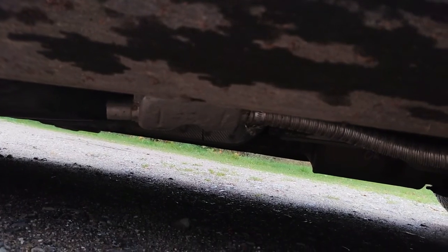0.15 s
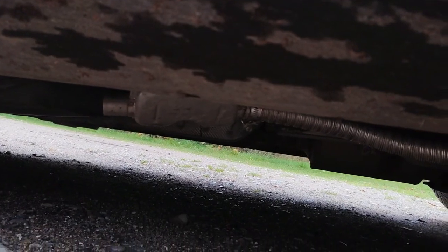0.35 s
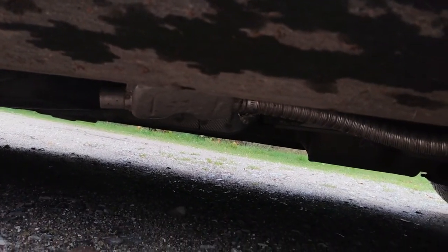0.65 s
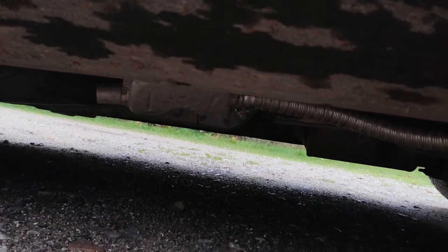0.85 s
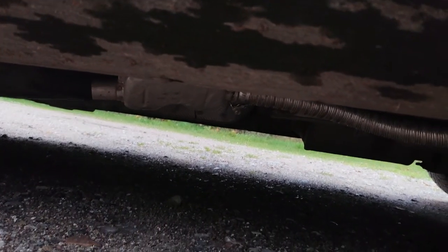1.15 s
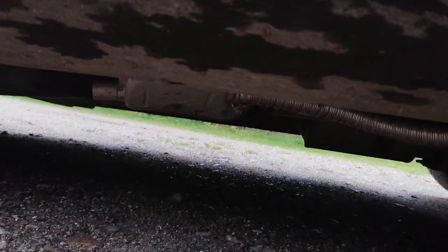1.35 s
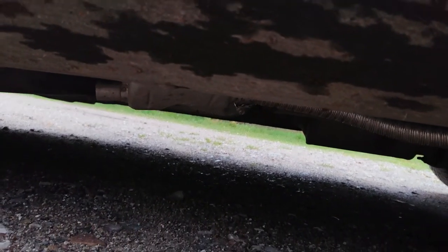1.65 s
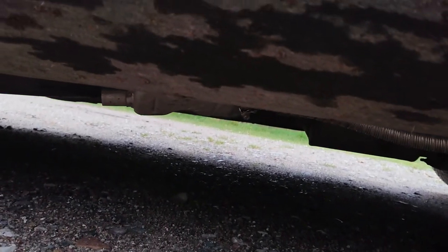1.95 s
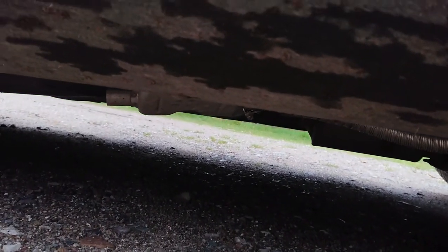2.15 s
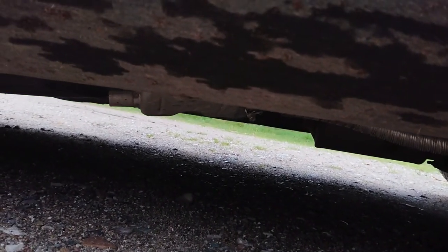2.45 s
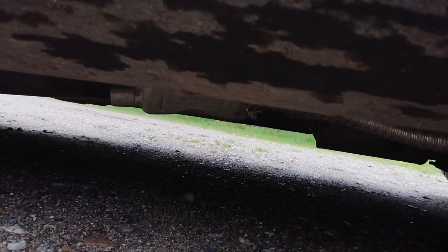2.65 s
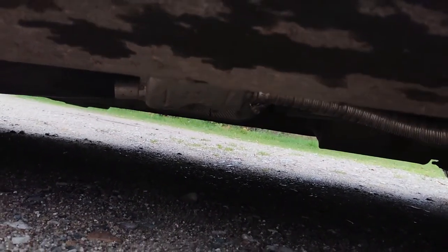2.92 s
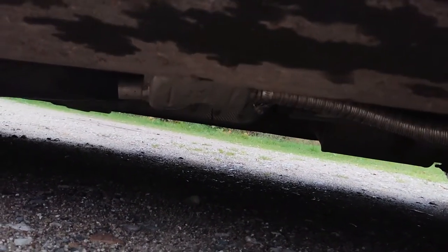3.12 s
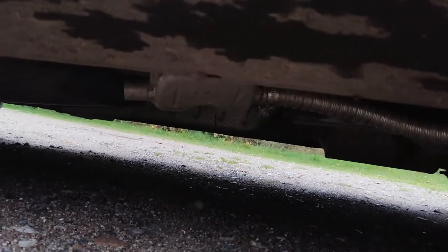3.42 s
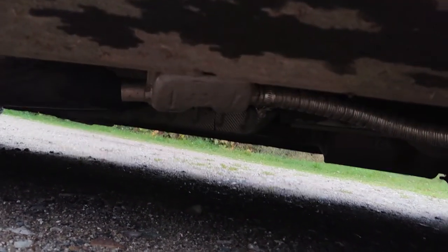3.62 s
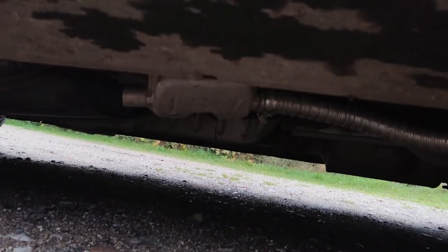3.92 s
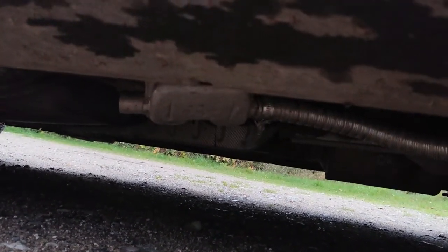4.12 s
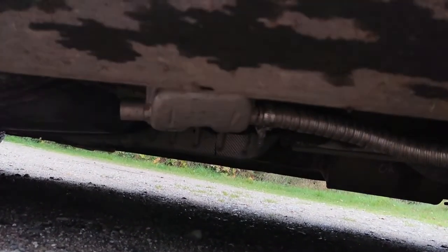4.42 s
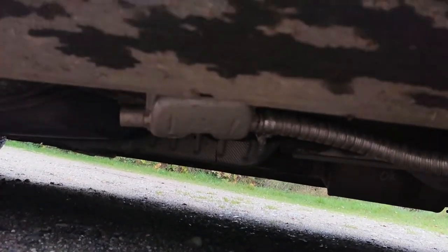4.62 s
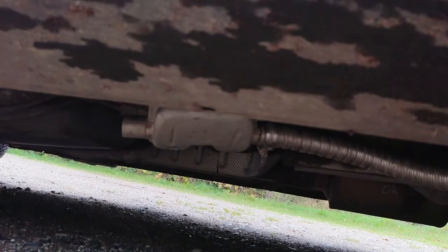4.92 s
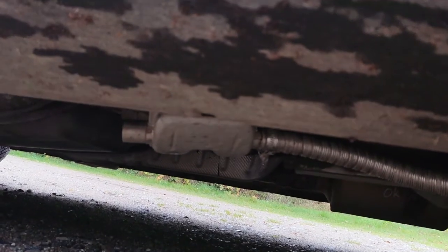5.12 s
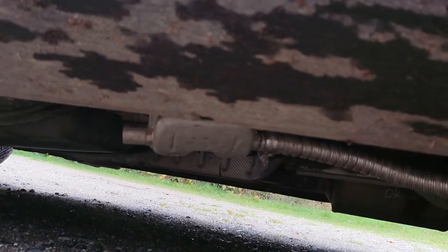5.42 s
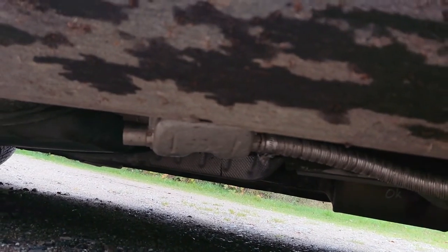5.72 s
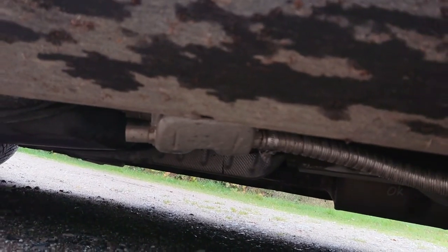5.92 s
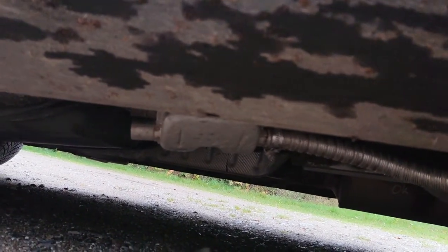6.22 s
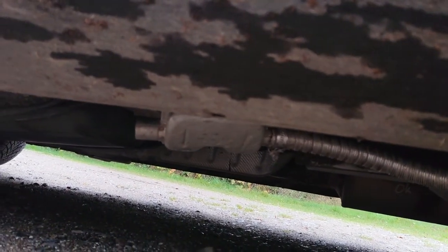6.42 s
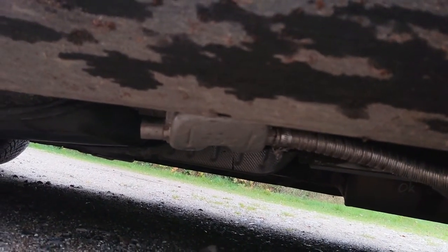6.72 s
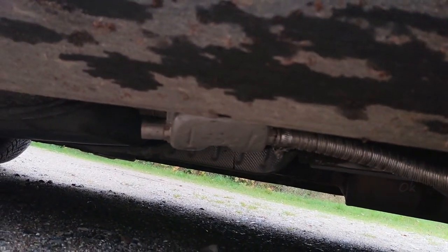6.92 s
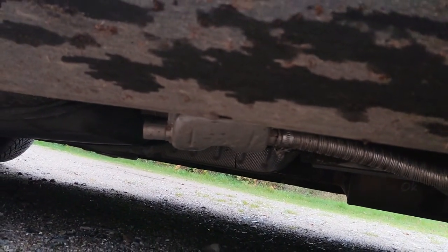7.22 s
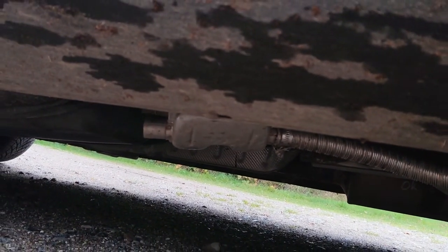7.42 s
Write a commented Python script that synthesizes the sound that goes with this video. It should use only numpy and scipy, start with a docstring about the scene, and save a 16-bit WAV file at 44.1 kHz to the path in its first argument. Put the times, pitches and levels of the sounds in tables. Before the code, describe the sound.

Under a parked vehicle, a small diesel heater exhaust burns steadily with a deep, uneven, puffing rumble. A quieter breathy hiss and faint multi-toned blower whine sit above it. The close hand-held microphone shifts around three to four seconds, changing the hiss's colour and stereo balance. Tiny ticks and light rustles occur, then a short cluster of dry scuffs just after four seconds. The rumble continues to the end.

```python
"""A low, uneven rumble with puffs, a whine and a hiss are heard at once: a diesel heater under a parked vehicle.
Turbulent burning, shaped as noise by pipe resonances, makes the rumble; surges of its level make the puffs.
The blower whines at multiples of its shaft speed, over noise coloured by silencer modes and a breathy whistle.
Midway the hand-held microphone passes the gas jet to another spot: the sources blend between three spots.
Ticks (filtered clicks), rustles and scuffs (grainy noise under envelopes) come from contact with its case."""
import sys
import numpy as np
from scipy import signal
from scipy.fft import rfft, irfft
from scipy.io import wavfile
from scipy.ndimage import uniform_filter1d, map_coordinates

SR = 44100
rng = np.random.default_rng(int(sys.argv[2]) if len(sys.argv) > 2 else 0)


def unload_wav(signal):
    """Save mono or channel-first audio to the path in sys.argv[1] as 16-bit WAV at rate SR, clipped to [-1, 1]."""
    wavfile.write(
        sys.argv[1],
        SR,
        np.round(np.clip(np.atleast_2d(signal).T, -1, 1) * 32767).astype(np.int16),
    )


N = 333528
TIME = np.arange(N) / SR
FREQS = np.maximum(np.arange(N // 2 + 1) * SR / N, 1)  # Hz, kept above zero for logarithms

# Path of the microphone. Each row: time in seconds, spot (0 = first, 1 = passing the jet, 2 = last).
MICROPHONE_PATH = [(0, 0), (2.75, 0), (3.2, 1), (3.9, 1), (4.2, 2), (7.56, 2)]

# Resonances of burner, pipe and silencer.
# Each row: frequency in Hz, nominal width in Hz (narrowed in use), relative power density in dB.
PIPE_RESONANCES = [(58.4, 16, -10.5), (92.06, 22.6, 1.7), (120.5, 48, -9.5), (172, 55, -17),
                   (224, 16, -20.5), (269.5, 51.7, -11.5), (302.3, 23.5, -12), (360, 75, -24),
                   (394.5, 38.4, -18), (408, 32, -27.5), (479.4, 24, -27), (531.4, 28, -27), (580, 17, -28),
                   (624, 19, -23.5), (667, 82, -24.5), (753, 49, -30.5)]
# Stereo lean of the flame. Each row: frequency in Hz, left minus right in dB.
FLAME_LEAN = [(60, -3.5), (300, -3), (500, -2), (800, 2)]
# Strength of the steady flame. Each row: time in seconds, deep boom in dB, roar above it in dB.
FLAME_LEVEL = [(0, -25, -34), (.8, -27, -32.5), (1.2, -27.5, -33), (1.6, -25.5, -32.5), (2.3, -26.5, -33.5),
               (3.3, -25.5, -32), (4.4, -26.5, -33), (5.3, -24, -31), (5.7, -25.5, -31), (6.5, -26, -31),
               (7.56, -23.5, -32.5)]
# Stronger puffs. Each row: crest in seconds, length in seconds at half height, change of boom in dB,
# change of roar in dB (negative where the roar sinks).
FLAME_PUFFS = [(.325, 0.063, 1, 3.5), (0.432, 0.021, 8, 8), (0.515, 0.039, 13, 2.5), (.749, 0.02, 3.3, 4),
               (0.855, 0.026, 8.7, -1), (1.046, 0.05, 5.9, -2), (1.402, 0.055, 3.7, -1),
               (1.691, 0.041, 2.5, -2), (1.791, 0.015, 6, 5.5), (2.0, 0.064, 3.5, -1),
               (2.65, 0.017, 8.2, 4), (2.815, 0.026, 7.9, -1), (2.912, 0.048, 2, 4),
               (3.09, 0.016, 6.6, 6.5), (3.157, 0.026, 0.84, 7), (3.269, 0.041, 4, 4.5),
               (3.39, 0.061, 7.3, 0.5), (3.544, 0.035, 7.5, 5), (3.658, 0.016, 5.9, -2),
               (3.781, 0.034, 8.2, 6.5), (3.873, 0.019, 12, 6), (3.96, 0.05, 4.1, 0.5),
               (4.115, 0.035, 6.7, -3.5), (4.154, 0.02, 3.2, 9), (4.516, 0.019, 4.2, 2),
               (4.585, 0.067, 7, 2), (4.762, 0.033, 9.2, 0.5), (4.84, 0.023, 3.1, 3.5),
               (4.966, 0.026, 7.9, -2.5), (5.135, 0.018, 5, 4), (5.224, 0.035, 3.8, 1.5),
               (5.303, 0.12, 3.5, 0.5), (5.412, 0.029, 4, 3), (5.474, 0.029, 2.7, 5),
               (5.907, 0.021, 7.9, 2.5), (6.265, 0.037, 7.5, 2), (6.367, 0.028, 6.5, 1),
               (6.455, 0.049, 6, 2.5), (6.813, 0.03, 7.7, 2.5), (6.974, 0.059, 6.2, -2),
               (7.34, 0.041, 1.6, 2.5)]
# Moments when the boom falters. Each row: centre in seconds, length in seconds at half height, change in dB.
FLAME_LULLS = [(0.49, 0.041, -5.5), (0.824, 0.026, -8.5), (1.127, 0.14, -3.5), (1.257, 0.067, -3.5),
               (1.714, 0.021, -8), (1.935, 0.08, -5.5), (4.31, 0.02, -10.5), (4.725, 0.049, -11),
               (5.078, .03, -5.5), (5.532, 0.025, -4.5), (5.594, 0.041, -3.5), (5.706, 0.037, -9),
               (6.308, 0.038, -4), (7.212, .03, -1)]
# A puff spends its fuel: length of the swing back after it, and size of that swing as a share of the change.
RECOIL_S, RECOIL_SHARE = 0.02, 0.33
# Boundaries in Hz between the low, middle and high part of the roar.
ROAR_BOUNDARIES_HZ = (335, 450)
# Parts of the roar, low to high. Each row: share of a puff that it follows, dB added at the last spot.
ROAR_BEHAVIOUR = [(1.0, -0.2), (0.47, 1.1), (0.16, 0.3)]

# Level of the gas hiss. Each row: time in seconds, level in dB.
HISS_LEVEL = [(0, -53.5), (1.2, -52.5), (2.3, -54), (2.9, -51), (3.3, -51), (3.8, -51), (4.5, -49.5),
              (6, -49), (7.56, -50.5)]
# Smooth spectrum of the hiss. Each row: frequency in Hz, relative density in dB at each of the three spots.
HISS_SLOPE = [(520, -23.5, -13, -18.5), (930, -5.5, -3, -1.5), (1084, -13, -4, -6.5),
              (1980, -15.5, -18.5, -21), (3330, -18.5, -17.5, -22), (4200.0, -22, -23.5, -30),
              (5930, -25, -21.5, -21), (6800.0, -34, -27, -31), (7140, -49.5, -47, -49)]
# Cross modes of the silencer and flexible pipe.
# Each row: frequency in Hz, nominal width in Hz (narrowed in use), gain in dB at each of the three spots.
SILENCER_MODES = [(1336, 570, 10, 3.6, 9), (1556, 540, 12.5, 10, 14), (1820, 470, 1.5, 9.7, 8.5),
                  (2110, 210, 3, 12.5, 7.5), (2237, 320, 12.5, 15, 10.5), (2560, 130, 0, 1.5, 8.5),
                  (2620, 1300, 3, 13.5, 13.5), (2940, 120, 4, 4, 11.5), (3230, 110, 13.5, 11, 9),
                  (3387, 140, 14, 11, 16), (3687, 240, -11.5, 11.5, 19), (3890, 970, 8, 13.4, 17.5),
                  (4070, 370, 10.5, 12, 18), (4380, 330, 7, 14.5, 12.5), (4700, 520, 2, 6, 8),
                  (5010, 260, 4, 8.5, 12), (5340, 236.0, 4, 1, 9.5), (5470, 450, 1.5, 0.5, -3.5),
                  (5820, 224.0, 3, 5.7, -15)]
# Stereo lean of the hiss. Each row: frequency in Hz, left minus right in dB at each of the three spots.
HISS_LEAN = [(650, 6.5, 3, 0), (960, -3.5, 8.5, 18), (1340, -2.5, -6, 7.5), (1600, -17, -15, 6.5),
             (2000, -17.5, -3.5, 0.5), (2200, 2.5, -6, -5), (2500, 1, -3, -8.5), (2780, -9.5, -1, -4),
             (3300, -1, -5, -7.5), (3700, -2, -7, -7), (4100, -5, -7.5, -11.5), (4500, 7.5, 5.5, 4),
             (5100, -2, 3, 2), (5800, 0.5, 0, 0.5), (6500, -3.5, -0.5, -1.5)]
# Direct sound and echoes from the underbody meet at the two microphone ports.
# Each row: frequency in Hz, radians by which the left leads at each of the three spots.
PORT_PHASE_LEAD = [(900.0, 0.1, -1.4, -1.6), (1035.0, 0.4, -2.2, -2.5), (1170.0, 1.8, -2.9, -1.4),
                   (1305.0, 2.3, -3.1, -3.5), (1440.0, 2.5, -3.1, -3.6), (1575.0, 4.0, -2.9, -3.8),
                   (1710.0, 4.6, -3.7, -4.9), (1845.0, 4.2, -2.5, -2.3), (1980.0, 4.4, -3.1, -0.0),
                   (2115.0, 3.0, -3.6, -0.6), (2250.0, 3.0, -3.9, 0.6), (2385.0, 5.9, -1.7, -1.1),
                   (2520.0, 3.8, -2.6, -3.2), (2655.0, 3.7, -3.1, -3.6), (2790.0, 6.3, -3.6, -2.1),
                   (2925.0, 7.3, -5.4, -0.6), (3060.0, 9.1, -3.8, -3.1), (3195.0, 9.2, -4.0, -3.5),
                   (3330.0, 10.2, -6.7, -2.8), (3465.0, 9.6, -8.8, -3.6), (3600.0, 10.1, -10.3, -4.9),
                   (3735.0, 10.6, -9.2, -5.4), (3870.0, 13.0, -12.2, -6.3), (4005.0, 12.6, -14.0, -7.0),
                   (4140.0, 12.2, -14.2, -7.9), (4275.0, 11.6, -14.4, -6.1), (4410.0, 13.0, -13.8, -3.5),
                   (4545.0, 15.2, -16.0, -3.6), (4680.0, 12.1, -14.0, -4.5), (4815.0, 12.8, -16.0, -5.6),
                   (4950.0, 15.7, -16.9, -5.5), (5085.0, 15.3, -18.3, -6.7), (5220.0, 14.3, -15.4, -6.4),
                   (5490.0, 11.2, -15.0, -9.1), (5760.0, 14.2, -17.0, -11.6), (5895.0, 13.4, -18.0, -13.2),
                   (6165.0, 12.0, -18.3, -9.0)]

# Blower shaft, before its small fluctuations. Each row: time in seconds, speed in turns per second.
SHAFT_SPEED = [(0, 45.44), (.55, 45.74), (.85, 45.98), (1.2, 46.15), (1.9, 46.66), (5.5, 46.66),
               (6.2, 46.69), (7.1, 46.71), (7.56, 46.63)]
# Fuel pump strokes per second, and the share by which they sway the blower's speed.
PUMP_HZ, PUMP_RIPPLE = 3.7, 0.00047
# Strong blower orders.
# Each row: multiple of the shaft speed, then level in dB left and right at each of the three spots.
STRONG_ORDERS = [(19, -64.0, -66.0, -62.5, -71.5, -59.0, -77.0),
                 (21, -62.5, -56.5, -56.5, -63.5, -50.0, -68.5),
                 (35, -80.0, -67.5, -64.5, -73.0, -58.0, -74.0),
                 (36, -71.0, -67.5, -67.5, -75.5, -56.0, -75.5),
                 (38, -78.0, -80.0, -87.0, -74.5, -73.5, -77.0),
                 (40, -73.5, -76.0, -72.0, -71.0, -79.5, -70.5),
                 (41, -67.5, -73.0, -66.0, -76.5, -79.0, -77.5),
                 (45, -75.0, -81.0, -76.0, -68.0, -81.5, -68.5),
                 (46, -79.5, -78.5, -80.0, -68.0, -83.5, -69.5),
                 (49, -78.5, -68.5, -85.0, -80.0, -78.5, -81.0),
                 (50, -79.5, -70.0, -78.0, -71.5, -76.5, -74.5),
                 (51, -75.0, -75.0, -73.0, -72.5, -63.5, -71.0),
                 (52, -69.5, -75.0, -71.5, -80.0, -66.0, -76.5),
                 (53, -74.0, -81.0, -71.0, -80.0, -80.0, -79.5),
                 (54, -68.5, -70.5, -73.0, -62.5, -75.5, -64.0),
                 (57, -64.5, -69.5, -65.0, -66.0, -74.5, -67.5),
                 (58, -71.5, -71.0, -74.0, -65.5, -71.5, -66.0),
                 (61, -74.0, -71.0, -74.0, -76.5, -72.0, -75.0),
                 (62, -73.0, -70.5, -75.0, -66.5, -68.5, -67.5),
                 (63, -79.0, -76.5, -78.0, -72.5, -86.0, -70.5),
                 (65, -83.0, -75.0, -88.0, -71.0, -80.0, -71.5),
                 (66, -87.5, -82.5, -81.0, -70.0, -76.0, -73.0),
                 (67, -80.0, -76.0, -73.0, -66.0, -73.5, -70.0),
                 (71, -79.5, -81.5, -80.0, -79.0, -85.5, -80.5),
                 (72, -65.5, -69.0, -66.0, -65.0, -72.5, -74.5),
                 (73, -82.0, -77.5, -85.5, -73.0, -81.5, -68.5),
                 (74, -67.0, -67.0, -81.5, -63.5, -71.0, -62.0),
                 (75, -72.0, -69.5, -87.5, -67.0, -79.0, -72.5),
                 (78, -77.5, -76.5, -86.0, -67.0, -82.5, -65.5),
                 (79, -76.5, -78.0, -88.0, -65.5, -69.0, -62.5),
                 (80, -72.0, -86.5, -79.5, -67.0, -73.5, -66.5),
                 (82, -75.0, -77.0, -77.5, -67.0, -74.0, -64.5),
                 (84, -74.0, -74.5, -73.5, -74.0, -81.5, -73.5),
                 (87, -83.0, -78.0, -79.0, -70.5, -79.0, -68.0),
                 (88, -78.0, -75.0, -79.0, -81.5, -77.0, -72.0),
                 (94, -78.5, -82.5, -74.5, -84.5, -92.0, -84.5),
                 (95, -77.0, -80.0, -73.0, -84.0, -76.0, -91.5),
                 (96, -76.0, -85.5, -84.0, -80.5, -72.0, -79.5),
                 (102, -87.0, -85.5, -80.0, -85.5, -78.0, -78.5),
                 (103, -88.5, -83.5, -89.5, -79.5, -89.0, -78.5),
                 (107, -85.5, -87.0, -82.0, -78.0, -85.0, -77.0),
                 (109, -83.5, -82.5, -80.5, -80.0, -85.5, -78.0),
                 (113, -80.0, -92.5, -92.0, -96.0, -83.5, -83.0),
                 (115, -87.0, -88.0, -84.0, -86.0, -73.0, -76.0),
                 (117, -82.0, -83.5, -80.0, -78.0, -80.5, -77.5),
                 (121, -82.0, -85.0, -88.0, -88.0, -90.0, -90.0)]
# Mean level of the weak orders. Each row: frequency in Hz, level in dB relative to the colour of the hiss.
WEAK_ORDER_LEVEL = [(1700, -73), (3300, -71), (4400, -66.5), (5800, -66)]
# This order rings out while the rising speed takes it through a pipe mode.
RINGING_ORDER, RING_HZ, RING_WIDTH_HZ, RING_DB = 36, 1645.6, 40, -62.5

# Breathy pipe whistle. Each row: time in seconds, pitch in Hz before wander, level in dB, left minus right in dB.
PIPE_WHISTLE = [(0, 1545, -59.5, -12), (1, 1578, -55.5, -12.5), (2.55, 1592, -59.5, -2.5),
                (2.88, 1585, -54.5, -16.5), (3.1, 1528, -57, -6.5), (3.8, 1550, -72.5, 7),
                (4.3, 1636, -62.5, 2.5), (7.56, 1656, -58, 4)]

# Small ticks. Each row: start in seconds, peak in dB before panning, left minus right in dB,
# lowest frequency in Hz, highest frequency in Hz.
CASE_TICKS = [(0.462, -34.5, -19.5, 496, 2200), (.93, -38, -11, 900, 4500), (1.058, -34.5, -15, 600, 2360),
              (2.053, -45, -23, 4000, 6800), (2.9535, -32.5, -20, 400, 4800), (3.133, -46, -8, 5220, 7450),
              (3.181, -32.5, -6, 800, 4200), (5.492, -43.5, 12, 2500, 6240), (6.172, -35.5, 6, 900, 2970)]
# Fingers brush lightly over the case. Each row: crest in seconds, length in seconds at half height, level in dB.
CASE_RUSTLES = [(.69, .04, -70), (.89, .13, -68), (1.07, .04, -75), (1.39, .02, -73), (1.49, .06, -70),
                (1.8, .06, -79), (2.77, .05, -72), (2.928, .022, -60), (2.96, .18, -77), (3.98, .025, -72),
                (4.35, .02, -72)]
# Spectrum of that brushing. Each row: frequency in Hz, relative density in dB.
RUSTLE_SPECTRUM = [(1000, 0), (6000, 5), (7700, -8), (11000, -4), (14500, 3)]
# A hand scuffs the case. Each row: start in seconds, length in seconds, level in dB, left minus right in dB.
CASE_SCUFFS = [(4.1085, 0.004, -33, 22), (4.112, 0.022, -44, 20), (4.142, 0.08, -63, 14),
               (4.168, 0.005, -44.5, 16), (4.202, 0.0045, -47, 7), (4.255, 0.0097, -42, 19),
               (4.2625, 0.02, -32, 36), (4.2755, 0.004, -32, 30), (4.301, 0.003, -25, 28)]
# Spectrum of the scuffs. Each row: frequency in Hz, relative density in dB.
SCUFF_SPECTRUM = [(300, 7.5), (700, 0), (1200, 4.5), (2700, 3), (4300, 1.5), (5600, 1.5), (6200, -5.5),
                  (7700, -34), (11000, -24), (15500, -20)]

CUTOFF_HZ = 15900  # upper limit of the output


def from_db(db):
    """Logarithmic level: twenty decibels are a tenfold amplitude."""
    return 10 ** (np.asarray(db) / 20)


def rms_one(x):
    """Power normalisation: scale a signal to a mean square of one."""
    return x / np.sqrt(np.mean(x ** 2) + 1e-20)


def in_time(rows):
    """Linear interpolation: read each column of a time curve at every sample."""
    seconds, *columns = np.transpose(rows)
    return [np.interp(TIME, seconds, column) for column in columns]


def at_hz(points, hz, axis=1):
    """Logarithmic frequency scale: interpolate one column of a spectrum along it."""
    points = np.array(points)
    return np.interp(np.log(hz), np.log(points[:, 0]), points[:, axis])


def pan(lean_db):
    """Intensity stereo: left and right gains of constant total power."""
    gains = from_db(np.array([[.5], [-.5]]) * lean_db)
    return gains / np.sqrt(np.mean(gains ** 2, axis=0))


def drift(rate):
    """Low-passed chance: smooth random motion of spread one, with its corner at a rate in Hz."""
    step = 64  # samples between the slow values
    count = N // step + 2
    hz = np.arange(count // 2 + 1) * SR / step / count
    slow = irfft(rfft(rng.standard_normal(count)) / (1 + (hz / rate) ** 2), count)
    return np.interp(TIME, np.linspace(0, N / SR, count), rms_one(slow))


def swell(s, length):
    """Gaussian envelope: a bell of height one around a moment, with its length taken at half height."""
    return np.exp(-np.log(2) * np.minimum((2 * (TIME - s) / length) ** 2, 20))


def stereo_noise(colour, lean_db, alike_hz, lag_s=0, lead=0):
    """Partial coherence: coloured noise, later on the right by lag and phase, less alike above alike_hz."""
    mid, side = rfft(rng.standard_normal((2, N)))
    alike = 1 / (1 + (FREQS / alike_hz) ** 2)
    both = np.sqrt(1 + alike) * mid + np.sqrt(1 - alike) * side * [[1], [-1]]
    delay_phase = 2 * np.pi * FREQS * lag_s + lead
    late = np.exp(-1j * delay_phase * np.array([[0], [1]]))
    return rms_one(irfft(both * late * colour * pan(lean_db), N))


def steadied(x, evenness, size):
    """Partial compression: take a share of the slow power swells out of a noise."""
    slow_power = uniform_filter1d(np.mean(x ** 2, axis=0), size=size)
    return rms_one(x / slow_power ** (evenness / 2))


def surges_db():
    """Unsteady combustion: puffs lift the boom, raise or lower the roar, then briefly swing back; lulls dip the boom."""
    boom = sum(db * swell(s, length) for s, length, db in FLAME_LULLS)
    roar = 0
    for s, length, boom_db, roar_db in FLAME_PUFFS:
        recoil = swell(s + length / 2 + RECOIL_S, RECOIL_S)
        puff = swell(s, length) - RECOIL_SHARE * recoil
        boom = boom + boom_db * puff
        roar = roar + roar_db * puff
    return boom, roar


def swayed(x, share=0.0351, rate_hz=6.17):
    """Frequency modulation: uneven heat and flow shift the pipe's resonances up and down."""
    shift = np.cumsum(share * drift(rate_hz))
    read = np.arange(N) + shift - shift[-1] * TIME / TIME[-1]  # no net shift at the end
    return np.array([map_coordinates(side, [read], order=3, mode="reflect") for side in x])


def fluttered(x, surge_db, place, depth_db=1.0, rate_hz=18.0):
    """Amplitude modulation by bands: parts of the roar flutter apart; the lowest follows the puffs most."""
    spectrum = rfft(x)
    band = np.digitize(FREQS, ROAR_BOUNDARIES_HZ)
    out = 0
    for k, (follows, moved_db) in enumerate(ROAR_BEHAVIOUR):
        level_db = follows * surge_db + moved_db * place + depth_db * drift(rate_hz)
        out = out + irfft(spectrum * (band == k), N) * from_db(level_db)
    return out


def flame(place, evenness=0.35, skirt=1.73, split_hz=185):
    """Resonance: turbulent burning excites the pipe; the deep boom surges more than the roar above."""
    power = 0
    for hz, width, db in PIPE_RESONANCES:
        power = power + from_db(db) ** 2 / (1 + ((FREQS - hz) / (width * 0.49)) ** 2) ** skirt
    # the open pipe radiates little bass, the silencer swallows the treble
    colour = np.sqrt(power / (1 + (52 / FREQS) ** 10) / (1 + (FREQS / 850) ** 10))
    deep_share = 1 / (1 + (FREQS / split_hz) ** 10)
    lean_db = at_hz(FLAME_LEAN, FREQS)
    boom = stereo_noise(colour * np.sqrt(deep_share), lean_db, alike_hz=1700, lag_s=0.00025)
    roar = stereo_noise(colour * np.sqrt(1 - deep_share), lean_db, alike_hz=1700, lag_s=0.00025)
    boom_db, roar_db = in_time(FLAME_LEVEL)
    boom_surge_db, roar_surge_db = surges_db()
    boom = steadied(swayed(boom), evenness, size=SR // 25) * from_db(boom_db + boom_surge_db)
    roar = steadied(roar, evenness, size=SR // 16)
    roar = fluttered(roar, roar_surge_db, place) * from_db(roar_db)
    return (boom + roar) * pan(1.4 - 0.53 * place)


def hiss_db(hz, spot):
    """Modal filtering: a smooth slope of the jet at one spot, shaped by the silencer's modes."""
    power = 1
    for centre, width, *db in SILENCER_MODES:
        power = power + (from_db(db[spot]) ** 2 - 1) / (1 + ((hz - centre) / (width * 0.15)) ** 2) ** 2
    return at_hz(HISS_SLOPE, hz, axis=spot + 1) + 10 * np.log10(np.maximum(power, .1))


def gas_hiss(spots, flutter_db=1.5):
    """Jet noise: gas hisses through the silencer's modes, with another colour at each spot."""
    out = 0
    for spot, weight in enumerate(spots):
        lean_db = at_hz(HISS_LEAN, FREQS, axis=spot + 1)
        lead = at_hz(PORT_PHASE_LEAD, FREQS, axis=spot + 1)
        colour = from_db(hiss_db(FREQS, spot))
        out = out + weight * stereo_noise(colour, lean_db, alike_hz=4900, lead=lead)
    return out * from_db(in_time(HISS_LEVEL)[0] + flutter_db * drift(35))


def shaft_turns(jitter=0.0003):
    """Integrated rotation: turns of the shaft so far; its speed trembles and sways with the fuel pump."""
    pump = PUMP_RIPPLE * np.sin(2 * np.pi * PUMP_HZ * TIME)
    speed = in_time(SHAFT_SPEED)[0] * (1 + jitter * drift(11.3) + pump)
    return np.cumsum(speed) / SR


def blower(spots, turns, waver_db=1.5, uneven_db=6.5, count=5, size=2 ** 15):
    """Order spectrum: tones at multiples of the shaft speed; a few stand out of a thicket of weak ones."""
    strong = {round(row[0]): row[1:] for row in STRONG_ORDERS}
    groups = np.zeros((count, len(spots), 2, size // 2 + 1), complex)   # group, spot, side, order
    for order in sorted(set(strong) | set(range(37, 128))):
        hz = order * SHAFT_SPEED[-1][1]  # place in the spectrum at the final speed
        colour_db = np.repeat([hiss_db(hz, spot) for spot in range(len(spots))], 2)
        chance_db = uneven_db * rng.standard_normal(len(colour_db))
        weak = at_hz(WEAK_ORDER_LEVEL, hz) + colour_db + chance_db
        level_db = np.reshape(strong.get(order, weak), (-1, 2))
        leads = [at_hz(PORT_PHASE_LEAD, hz, axis=spot + 1) for spot in range(len(spots))]
        phases = rng.uniform(0, 2 * np.pi) - np.outer(leads, [0, 1])
        groups[order % count, :, :, order] = from_db(level_db) * np.exp(1j * phases)
    # one turn of the shaft as a wavetable, scaled so that the levels are effective values
    one_turn = (irfft(groups, size) * size / np.sqrt(2)).astype(np.float32)
    shaft = (turns * size).astype(int) % size
    heard = 0
    for wave in one_turn:  # interleaved groups of orders waver on their own
        heard = heard + np.take(wave, shaft, axis=-1) * from_db(waver_db * drift(24.0))
    return sum(weight ** 2 * whine for weight, whine in zip(spots, heard))


def ringing_order(turns, lean_db=-9):
    """Passage through resonance: one blower tone swells and fades as it climbs through a pipe mode."""
    off = 2 * (RINGING_ORDER * in_time(SHAFT_SPEED)[0] - RING_HZ) / RING_WIDTH_HZ
    tone = np.sqrt(2) * np.sin(2 * np.pi * RINGING_ORDER * turns)
    return from_db(RING_DB) * pan(lean_db) * tone / (1 + off ** 4)


def whistle(flutter_hz=20, wander_hz=10, evenness=0.21):
    """Flow-excited tone: gas stirs a narrow pipe tone that flutters finely and wanders in pitch."""
    hz, db, lean_db = in_time(PIPE_WHISTLE)
    quarter_turn = np.array([[0], [np.pi / 2]])  # between left and right
    phase = 2 * np.pi * np.cumsum(hz + wander_hz * drift(5.4)) / SR + quarter_turn
    tone = drift(flutter_hz) * np.cos(phase) + drift(flutter_hz) * np.sin(phase)
    return from_db(db) * pan(lean_db) * steadied(tone, evenness, size=SR // 20)


def high_whine(place, hz=15660, width_hz=60, db=-85.5, rise_db=9.0):
    """Narrow-band noise: a very faint, thin whine at the top of hearing, stronger at the last spot."""
    colour = 1 / (1 + ((FREQS - hz) / width_hz) ** 2)
    return from_db(db + rise_db * place) * stereo_noise(colour, 10, alike_hz=8000)


def ticks(decay_s=0.0018, crackle=0.085):
    """Impulse excitation: tiny contacts, a snap and a brief crackle, each in a band of its own."""
    out = np.zeros((2, N))
    age = TIME[:SR // 20]
    for s, db, lean_db, low_hz, high_hz in CASE_TICKS:
        contact = (age == 0) + crackle * rng.standard_normal(len(age)) * np.exp(-age / decay_s)
        band = signal.butter(3, [low_hz, high_hz], "band", fs=SR, output="sos")
        tick = signal.sosfilt(band, contact)
        start = round(s * SR)
        out[:, start:start + len(age)] += from_db(db) * pan(lean_db) * tick / np.abs(tick).max()
    return out


def rustles(grain_db=4.0, lean_db=-3.5, grains_hz=250):
    """Light friction: airy, grainy brushing that swells and fades with each shift of the grip."""
    air = stereo_noise(from_db(at_hz(RUSTLE_SPECTRUM, FREQS)), lean_db, alike_hz=9000)
    grainy = rms_one(air * from_db(grain_db * drift(grains_hz)))
    return grainy * sum(from_db(db) * swell(s, length) for s, length, db in CASE_RUSTLES)


def scuffs(grain_db=1.5, rise_s=0.00092, fall_s=0.0039):
    """Sliding friction: short grainy rubs that die quickly as the skin stops sliding."""
    rub = stereo_noise(from_db(at_hz(SCUFF_SPECTRUM, FREQS)), 0, alike_hz=2500)
    rub = rms_one(rub * from_db(grain_db * drift(300)))
    strokes = 0
    for s, length, db, lean_db in CASE_SCUFFS:
        rise = np.clip((TIME - s) / rise_s, 0, 1)
        fall = np.exp(-np.clip((TIME - s - length) / fall_s + 1, 0, 20))
        strokes = strokes + from_db(db) * pan(lean_db) * rise * fall
    return rub * strokes


def scene():
    """Superposition: all sources add, with flame, hiss and blower varying between the microphone's spots."""
    place, = in_time(MICROPHONE_PATH)
    spots = np.sqrt([np.clip(1 - np.abs(place - spot), 0, 1) for spot in (0, 1, 2)])
    turns = shaft_turns()
    heater = flame(spots[-1]) + gas_hiss(spots)
    heater = heater + blower(spots, turns) + ringing_order(turns)
    heater = heater + whistle() + high_whine(spots[-1])
    return heater + ticks() + rustles() + scuffs()


def record(dry):
    """Band limiting: the ends are eased over 4 ms and the top is cut steeply."""
    ease = np.clip(np.minimum(TIME, TIME[-1] - TIME) / .004, 0, 1)
    low_pass = signal.ellip(10, .1, 80, CUTOFF_HZ, fs=SR, output="sos")
    return signal.sosfilt(low_pass, dry * ease)


dry = scene()
out = record(dry)
unload_wav(out)
```